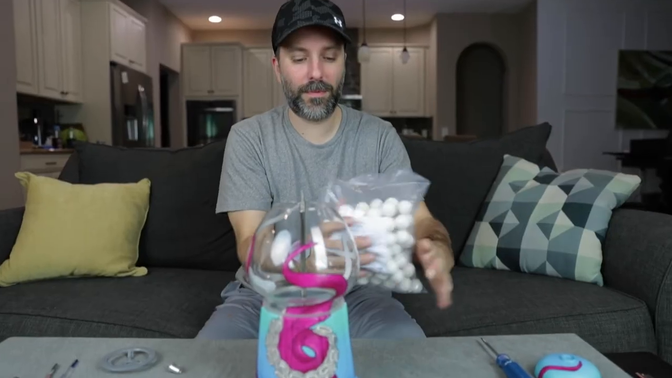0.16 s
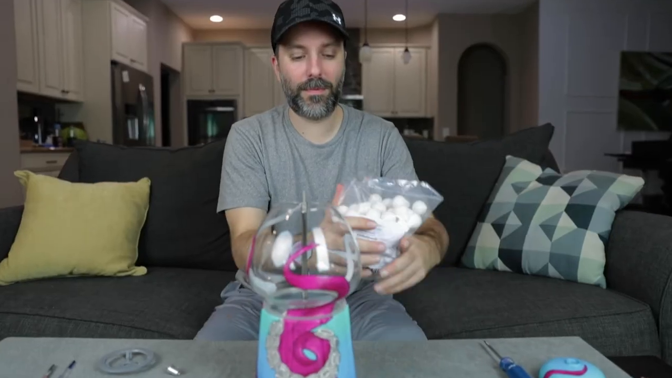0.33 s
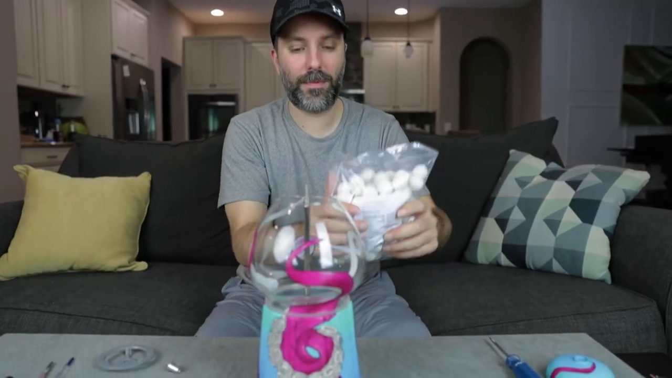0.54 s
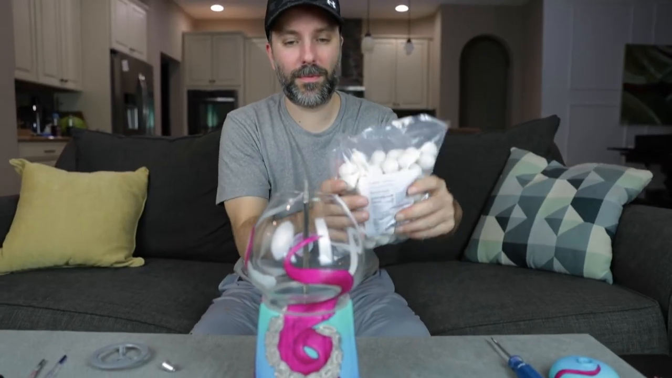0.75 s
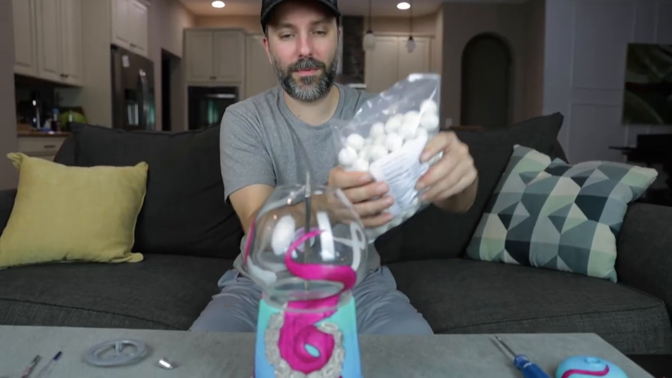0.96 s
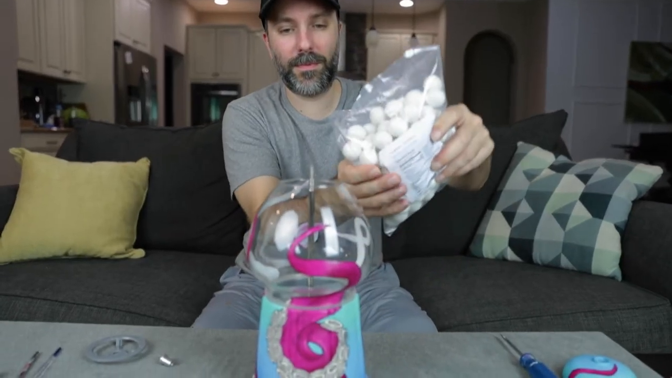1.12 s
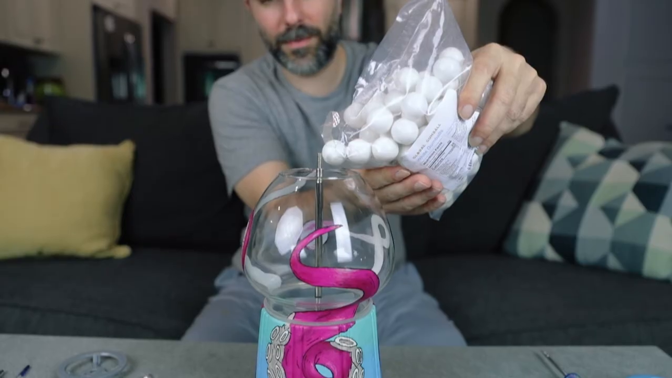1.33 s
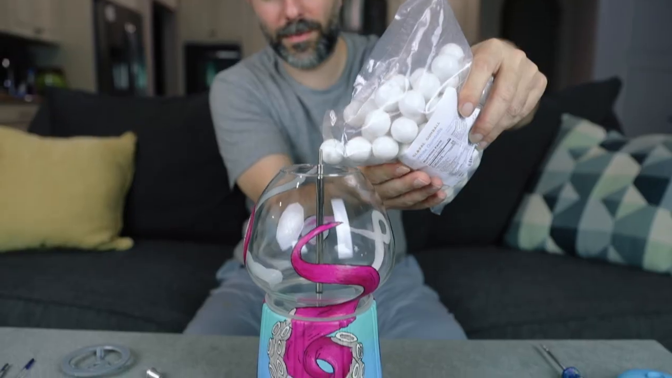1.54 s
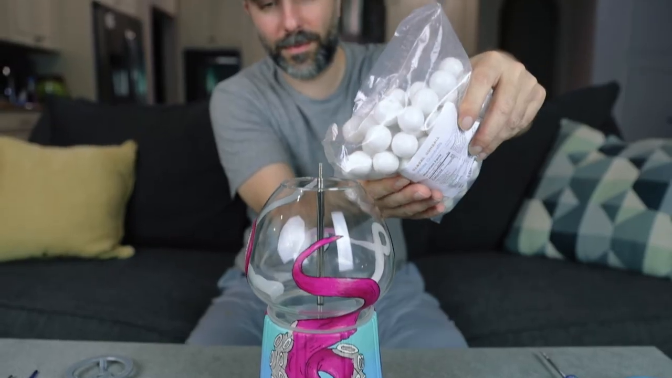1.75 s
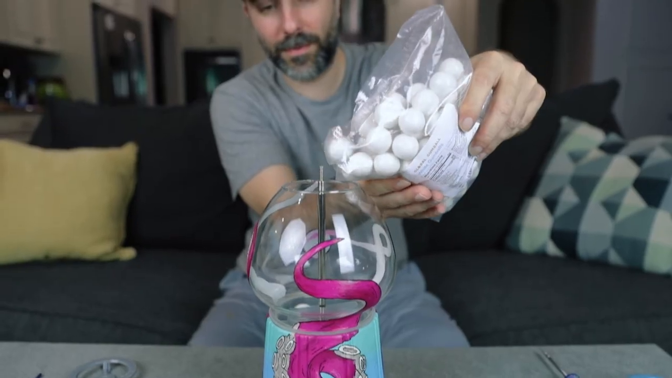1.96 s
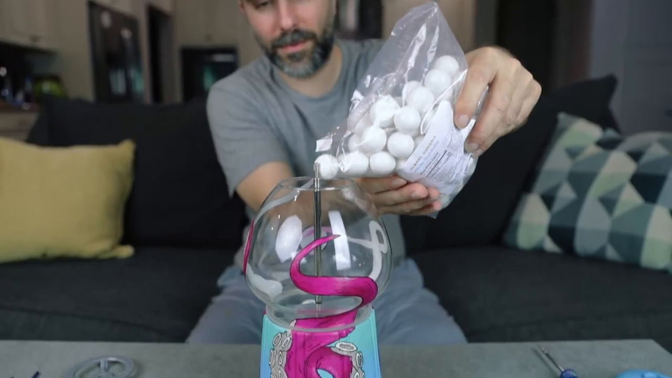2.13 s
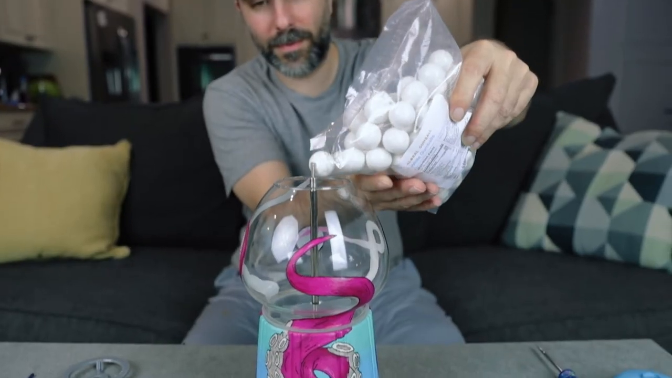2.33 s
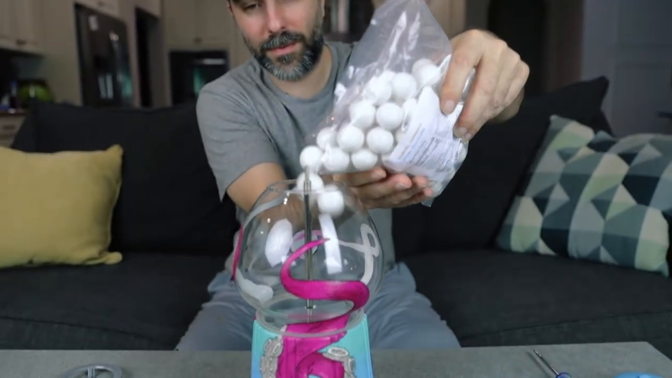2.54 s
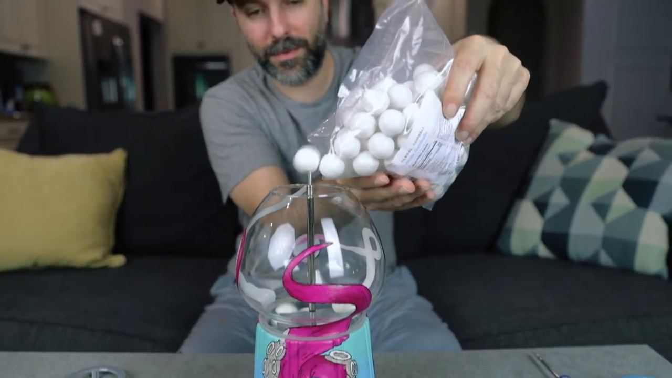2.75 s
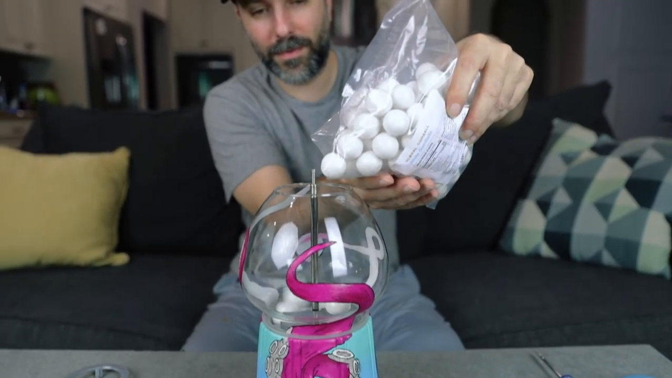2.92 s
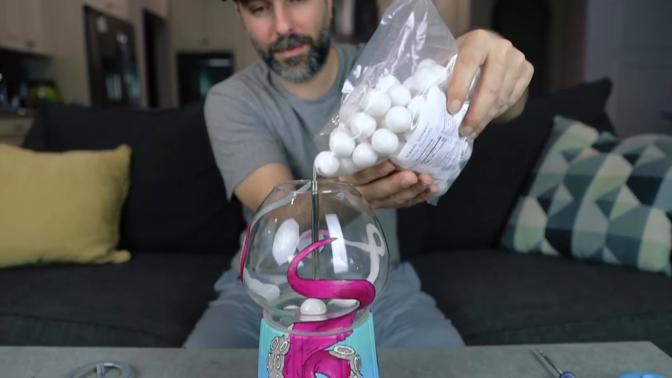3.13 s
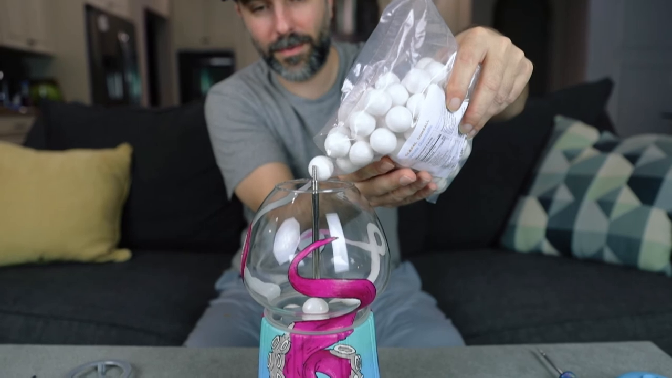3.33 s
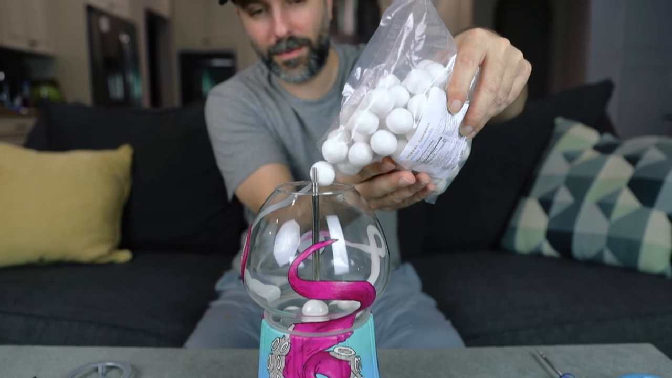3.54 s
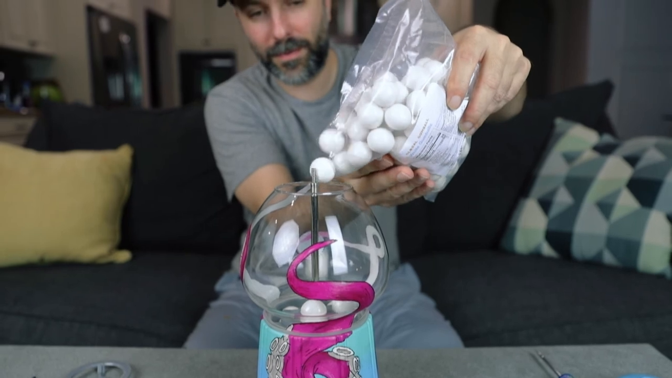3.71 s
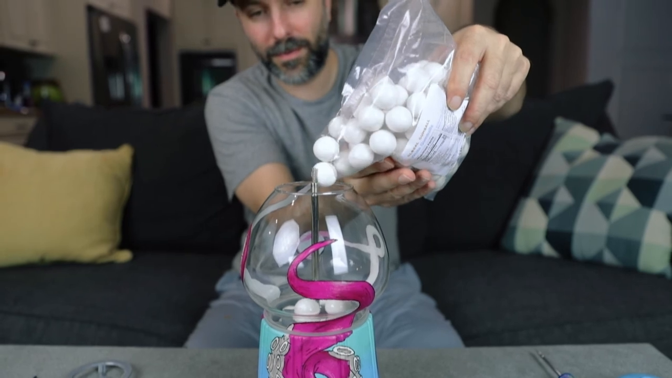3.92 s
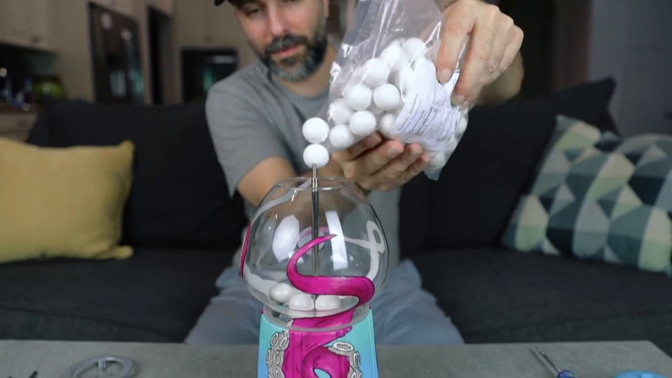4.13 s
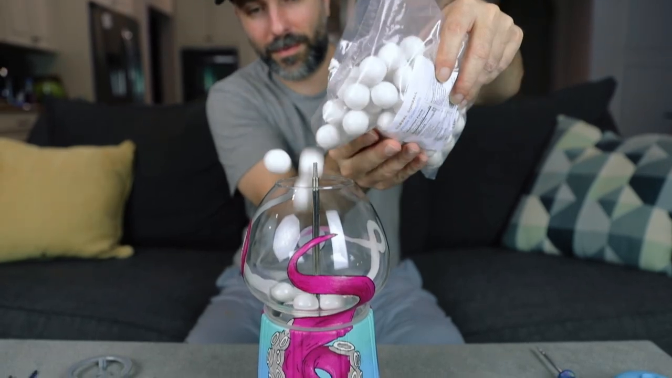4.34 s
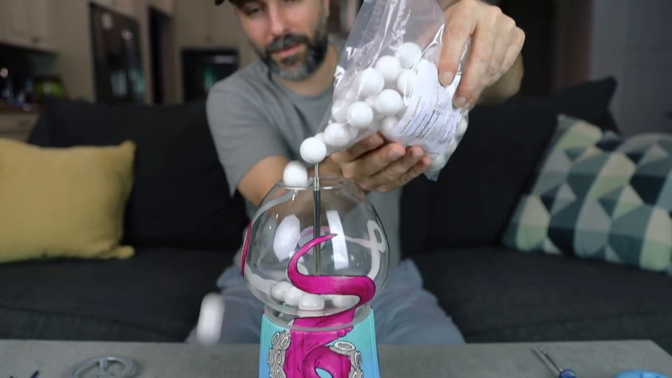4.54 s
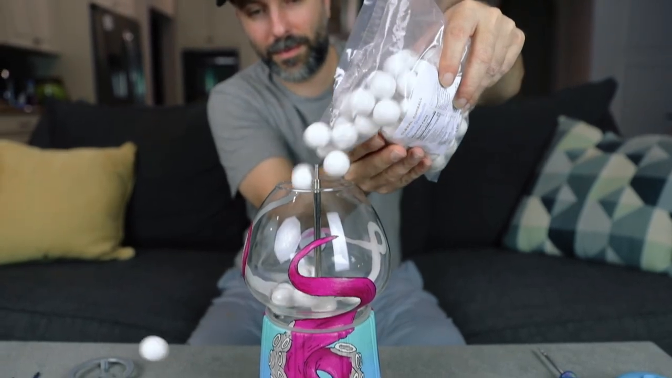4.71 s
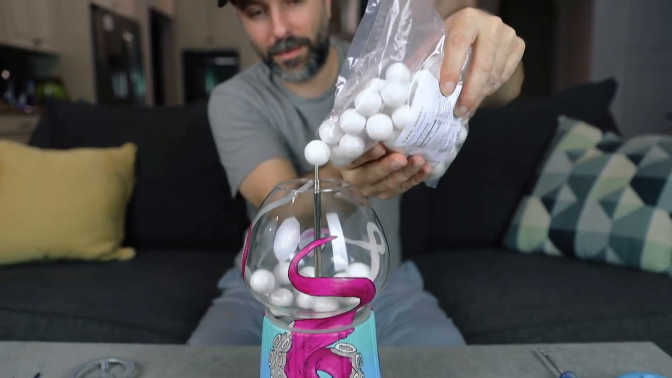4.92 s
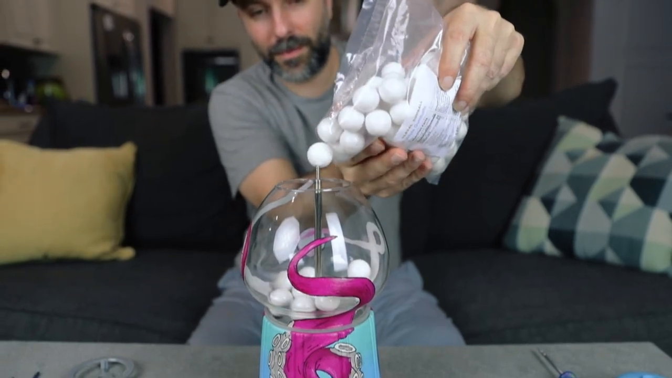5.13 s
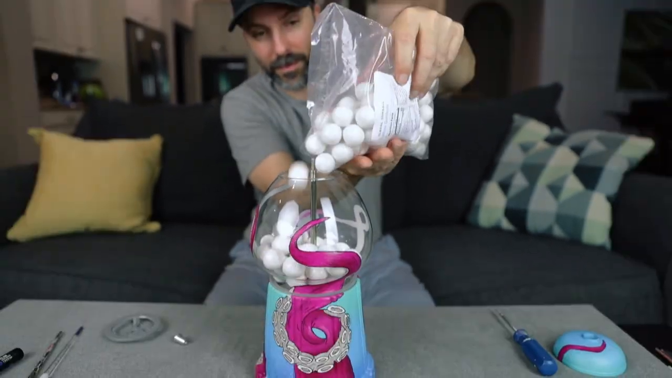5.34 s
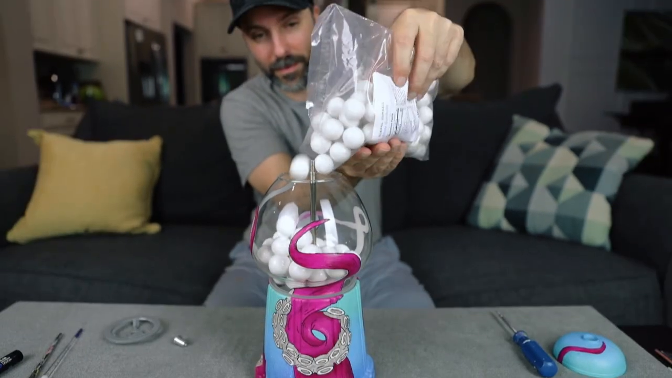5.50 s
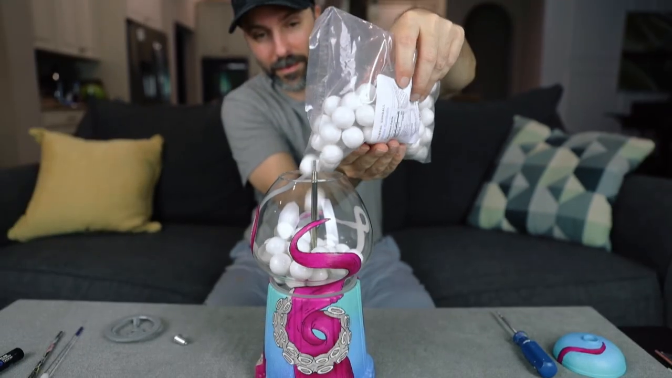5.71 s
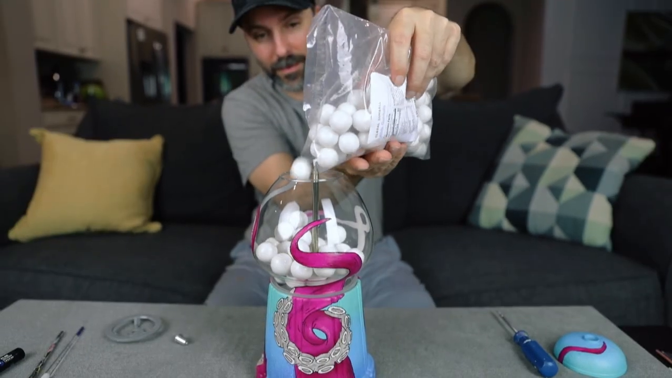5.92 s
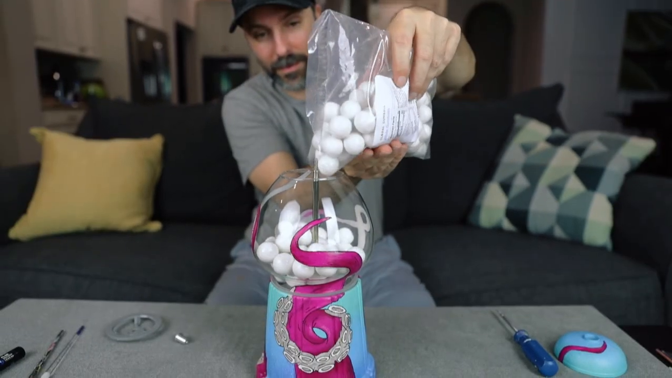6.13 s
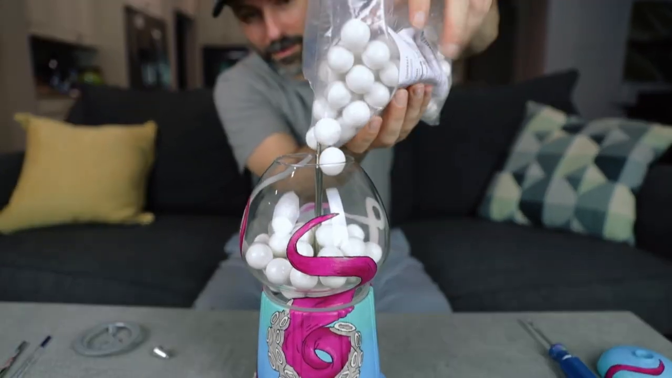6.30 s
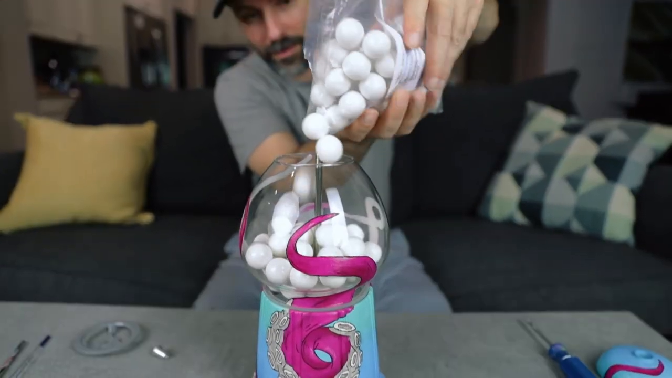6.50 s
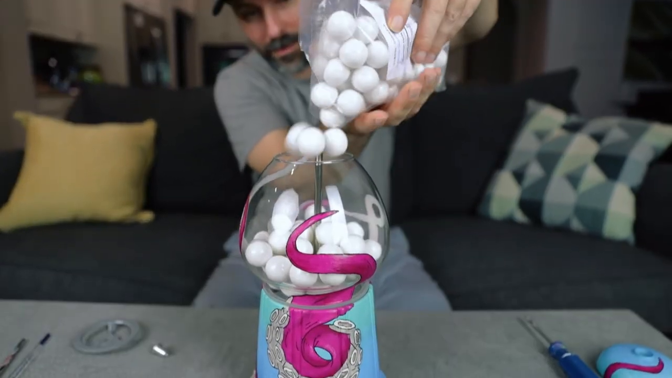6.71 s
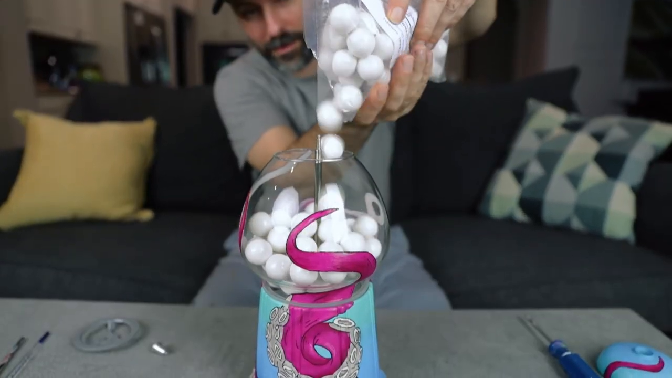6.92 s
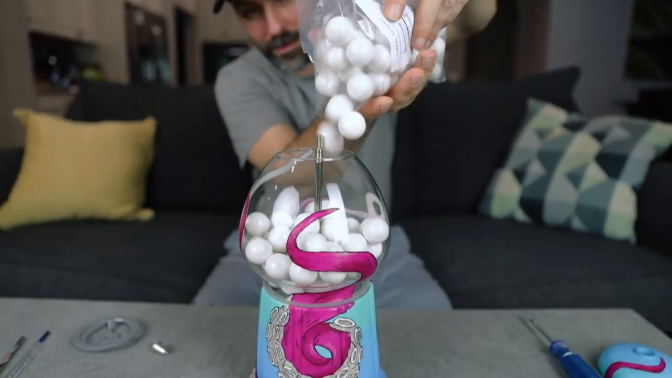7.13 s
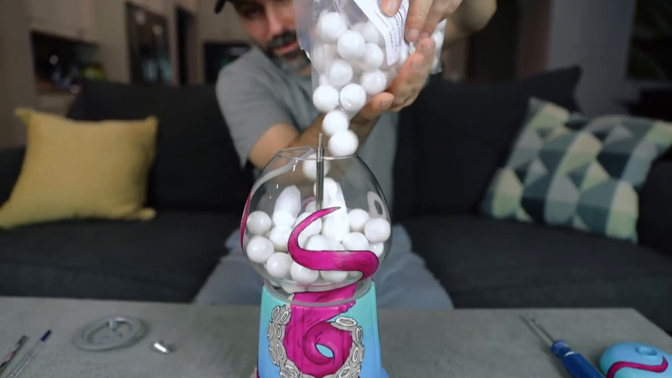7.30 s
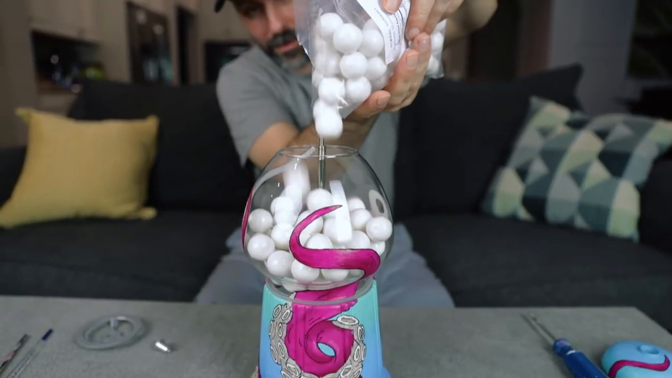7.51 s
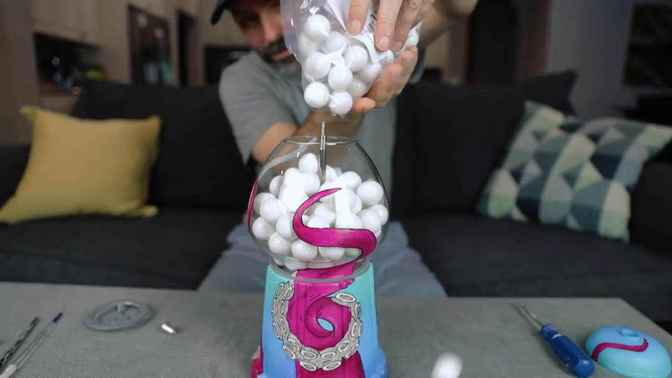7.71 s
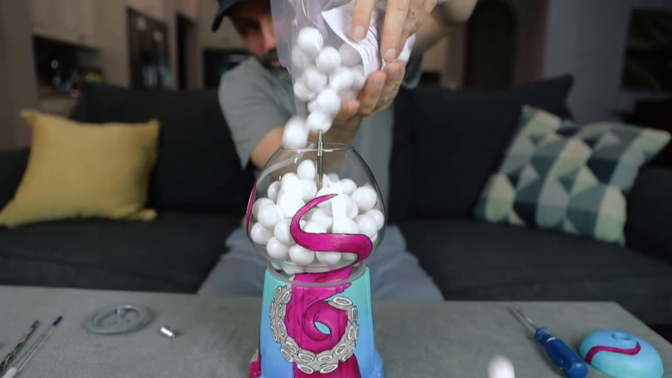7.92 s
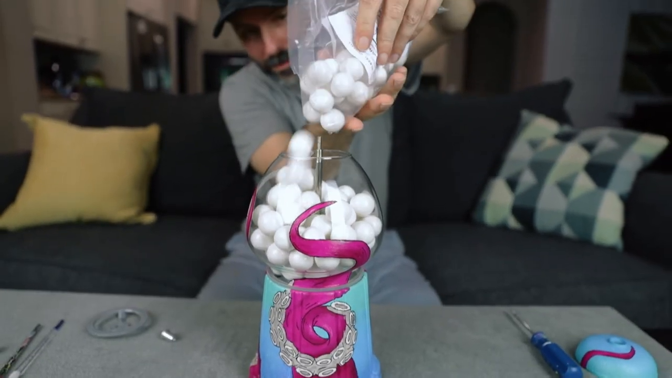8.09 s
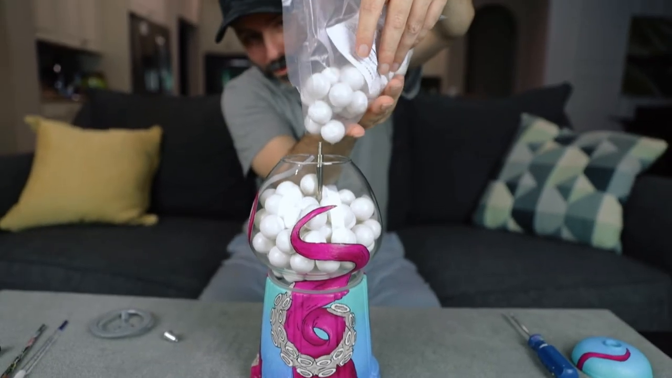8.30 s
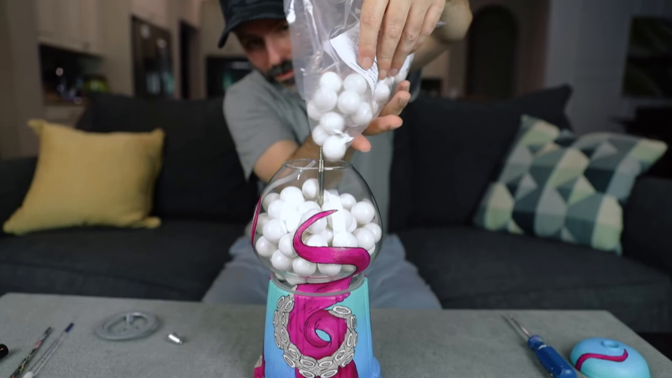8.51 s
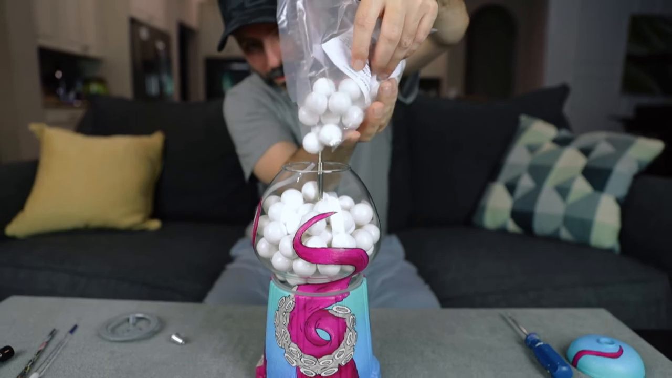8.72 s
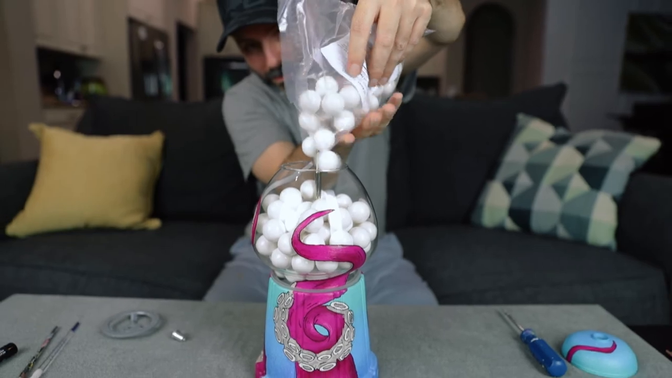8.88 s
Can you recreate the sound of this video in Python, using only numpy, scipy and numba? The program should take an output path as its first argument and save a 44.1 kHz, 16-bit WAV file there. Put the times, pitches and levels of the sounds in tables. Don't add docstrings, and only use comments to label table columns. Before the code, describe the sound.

Small hard hollow balls rattle in a plastic bag, then drop into a glass globe with bright pings, dense clatter and duller final clicks.

```python
import sys
import numpy as np
from scipy import signal
from scipy.fft import rfft, irfft
from scipy.io import wavfile
from scipy.ndimage import uniform_filter1d
from numba import njit

SR = 44100
rng = np.random.default_rng(int(sys.argv[2]) if len(sys.argv) > 2 else 0)


def generate_wav(signal):
    frames = np.transpose(np.atleast_2d(signal))
    scaled = np.clip(frames, -1, 1) * 32767
    pcm = np.round(scaled).astype(np.int16)
    wavfile.write(sys.argv[1], SR, pcm)


def field_ratio(decibels):
    return 10 ** (np.asarray(decibels, dtype=float) / 20)


N = 394694
TIME_S = np.arange(N) / SR


def rms_one(x):
    return x / np.sqrt(np.mean(x ** 2) + 1e-20)


def band(x, low_hz, high_hz, order=2):
    return signal.sosfilt(signal.butter(order, [low_hz, min(high_hz, .45 * SR)], "band", fs=SR, output="sos"), x)


def strikes(s, db):
    out = np.zeros(N)
    np.add.at(out, np.minimum(np.round(np.asarray(s) * SR).astype(int), N - 1), field_ratio(db))
    return out


def burst(clicks, t60_s):
    envelope = signal.lfilter([1], [1, -field_ratio(-60 / (t60_s * SR))], clicks + 1e-18)
    return envelope * rng.standard_normal(N)


def two_pole(clicks, hz, radius, sign=1):
    w = 2 * np.pi * hz / SR
    return signal.lfilter([0, sign * np.sin(w)], [1, -2 * radius * np.cos(w), radius ** 2], clicks + 1e-18)


CUTS_S = [1.333, 4.168, 5.295, 6.257]


def cut_samples():
    return (np.array(CUTS_S) * SR).astype(int)


# time in seconds, share of the globe filled (0 to 1).
FILL = [(0, 0), (4.2, .04), (4.6, .07), (5.29, .15), (5.3, .45), (6, .7), (8.95, 1)]


def filled(s):
    return np.interp(s, *np.transpose(FILL))


@njit
def resonate(clicks, turn, keep):
    out, state = np.zeros(len(clicks)), 0j
    for i in range(len(clicks)):
        state = state * turn * keep[i] + clicks[i]
        out[i] = state.imag
    return out


# time in seconds, loss of the stifled rim modes in dB (below 0: none).
LEANS = [
    (2.948, 2.5),
    (8.11, 12),
    (4.495, -3),
    (4.86, 32),
    (4.932, 27),
    (7.05, 5),
    (7.325, -4),
    (7.6, 15),
    (8.1, 13),
    (8.25, 20),
]


def ring(clicks, hz, t60_empty_s, t60_full_s):
    fill = filled(TIME_S)
    keep = 1 - np.log(1000) / SR * ((1 - fill) / t60_empty_s + fill / t60_full_s)
    if hz in (RIM_HZ[0], RIM_HZ[2]):
        s, loss_db = np.transpose(LEANS)
        keep[(s * SR).astype(int)] *= field_ratio(-np.clip(loss_db, 0, 40))
    keep[cut_samples()] = 0
    return resonate(clicks + 1e-18, np.exp(2j * np.pi * hz / SR), keep)


def body(modes, s, db, spread_db, taps=0):
    chance, out = rng.standard_normal((len(s), len(modes))), 0
    for k, (hz, level_db, t60_empty_s, t60_full_s) in enumerate(modes):
        clicks = strikes(s, db + level_db + spread_db * chance[:, k]) + field_ratio(level_db) * taps
        out = out + (-1) ** (k // 4) * ring(clicks, hz, t60_empty_s, t60_full_s)
    return out


# time in seconds, strength in dB, low hum in dB, hardness (high ring) in dB.
RIM_HITS = [(1.871, -30, -35.5, -59), (2.8882, -9.5, -13, -12.5), (3.844, -47, -34.5, -53),
            (4.394, -9, -10.5, -3.5), (4.4772, -17.5, -24, -15), (4.5262, -15.5, -10.5, -7),
            (4.6006, -18, -10.5, -21), (4.78, -6, -12.5, -9.5), (4.8712, -16, -7.5, -47),
            (4.9645, -39, -9, -40), (5.47, -48, -23.5, -45), (5.8793, -25, -17, -43),
            (6.105, -21.5, -19, -23), (6.2, -26.5, -48, -47), (6.283, -30, -55, -55),
            (6.466, -30, -29.5, -26), (6.74, -21, -37, -9.5), (6.824, -19.5, -21.5, -23.5),
            (6.9207, -22, -18.5, -38), (6.9444, -12.5, -29, -12.5), (6.9843, -11.5, -13.5, -8),
            (7.1318, -17.5, -16, -29), (7.222, -10, -14.5, -10.5), (7.2625, -15.5, -16, -22),
            (7.279, -9, -16.5, -11), (7.4763, -23, -20, -20), (7.4887, -9.5, -12, -7),
            (7.5557, -9.5, -17, -8.5), (7.6292, -7, -16.5, -9), (7.7551, -20, -42, -28),
            (8.0121, -13, -28, -10), (8.0498, -9.5, -39, -10), (8.134, -27, -50, -30),
            (8.1756, -12, -19, -10.5), (8.2303, -16.5, -25, -22), (8.522, -44, -108, -44),
            (8.692, -22, -32, -22.5)]
# main, hum, high, top. Frequencies in Hz.
RIM_HZ = [2821, 1003, 5072, 7360]
# t60 in seconds with the globe empty, t60 in seconds with it full.
RIM_T60 = [(0.3, 0.25), (1.75, 0.16), (0.24, 0.13), (0.065, 0.045)]


def rim():
    s, strength_db, hum_db, hard_db = np.transpose(RIM_HITS)
    top_db = 0.6 + 0.72 * hard_db + 0.28 * strength_db
    pings = 0
    for hz, t60_s, db in zip(RIM_HZ, RIM_T60, [strength_db, hum_db, hard_db, top_db]):
        pings = pings + ring(strikes(s, db - 6.0), hz, *t60_s)
    pings = pings + ring(strikes(s, strength_db - 5), RIM_HZ[0] - 3.64, *RIM_T60[0])
    pings = pings + ring(strikes(s, hard_db - 34), RIM_HZ[2] + 13, *RIM_T60[2])
    contact = band(burst(strikes(s, top_db + 13.0), 0.0017), 1900, 6200)
    return band(pings, 500, 19000) + contact


# time in seconds, clack in dB, tick in dB, thump in dB.
FLOOR_HITS = [(1.8715, -23.5, -10, -35), (1.879, -24, -2, -17), (1.8915, -22, -9, -40),
              (2.075, -51, -45, -43), (2.102, -49, -45, -62), (1.95, -29, -19, -62),
              (1.9667, -44, -16, -24), (2.0032, -35, -35, -55), (2.0921, -36.5, -25, -56),
              (2.3084, -36, -31, -40), (2.344, -38, -51, -34.5), (2.7245, -15, 0.5, -16.5),
              (2.7928, -15.5, -4, -15.5), (2.961, -26, -16.5, -29), (3.0086, -20, -28, -26),
              (3.0257, -45.5, -17.5, -22.5), (3.7257, -35.5, -36, -65), (3.7711, -31.5, -47, -47),
              (3.817, -18, -6, -23), (4.4873, -17, -3, -21.5), (4.5613, -30, -21, -23.5),
              (4.7296, -15, -5, -13.5), (4.9576, -23, 3.5, -13.5)]
# time in seconds, clack in dB, tick in dB.
PILE_HITS = [(5.47, -22, -10), (5.4941, -20.5, -24), (5.517, -27.5, -45), (5.541, -38, -45),
             (5.596, -55, -65), (6.005, -34, -20), (6.04, -45, -28), (6.188, -25, -22), (6.234, -32, -46),
             (7.272, -20, -7), (7.347, -26, -18), (7.43, -20.5, -19), (7.715, -52, -32), (8.11, -24, -30),
             (8.145, -25.5, -27), (8.157, -26, -31), (8.24, -27.5, -4), (6.681, -25.5, -22),
             (6.7085, -26.5, -21), (6.874, -17, -23), (6.8943, -20.5, -4.5), (7.3346, -17, -14),
             (7.3586, -21, -13), (7.4071, -23, -13), (7.452, -23, -10), (7.5292, -15.5, -7),
             (7.599, -18.5, -8), (7.6848, -21.5, -11), (7.7547, -19, -20), (7.791, -28, -45),
             (7.978, -28.5, -31), (8.2133, -24, -13), (8.2861, -23, -14.5), (8.6602, -23, -17),
             (8.694, -33, -14), (8.7696, -64, -24)]
# time in seconds, ring in dB, tick in dB.
BARE_WALL_HITS = [(2.7806, -12, -33), (2.8305, -8, -6), (2.9997, -18, -1.5), (3.066, -8, -7),
                  (3.2046, -26.5, -54), (3.3347, -23, -40.5), (3.5363, -33, -43), (3.842, -12, -48),
                  (4.0326, -24, -30.5), (4.5386, -9, -10), (4.563, -12, -12), (4.6023, -19, -11),
                  (4.744, -7.5, -45), (4.7964, -8.5, -1.5), (4.857, -11, -11.5), (4.8964, -7, -6),
                  (4.935, -5, -3), (4.9593, -3.5, -21), (5.028, -5.5, -11.5), (5.061, -11, -11),
                  (5.0947, -9.5, -8.5), (5.247, -19, -18.5)]
# time in seconds, ring in dB, tick in dB.
BURIED_WALL_HITS = [(5.6566, -24, -23), (5.66, -12, -9), (5.6942, -19.5, -16.5), (5.786, -29, -28),
                    (5.81, -19.5, -29), (5.8526, -16.5, -16), (5.928, -16, -17), (5.968, -20, -25),
                    (6.908, -7, -29), (7.094, -29, -9), (7.102, -18, -30), (7.112, -17, -15),
                    (5.7124, -17, -15), (5.7701, -17.5, -19), (5.8214, -12.5, -10.5), (5.881, -11.5, -5.5),
                    (5.949, -26, -13.5), (6.0712, -13, -12.5), (6.099, -13, -8.5), (6.141, -22, -14),
                    (6.1766, -17, -26), (6.211, -21.5, -21), (6.6139, -13.5, -9), (6.9044, -30, -6),
                    (7.003, -11.5, -5), (7.0814, -6.5, -11), (7.1278, -11.5, -7.5), (7.4651, -12.5, -7),
                    (7.6561, -24, -7.5)]
# time in seconds, clack in dB.
SOFT_CLICKS = [(2.5416, -41), (2.595, -38.5), (3.266, -38.5), (4.25, -50.5), (4.317, -40.5), (5.323, -33.5),
               (6.384, -41), (6.518, -30.5), (7.902, -30.5), (7.947, -40), (8.4142, -35), (8.546, -35.5),
               (8.583, -35), (8.745, -34), (8.789, -28.5), (8.6227, -35), (8.8985, -32.5)]


def all_knocks():
    rows = [(s, tick, clack, clack - 33, thump) for s, clack, tick, thump in FLOOR_HITS]
    rows += [(s, tick, clack, clack - 3.5, clack - 6) for s, clack, tick in PILE_HITS]
    rows += [(s, tick, (wall + tick) / 2 - 13, wall, tick - 19) for s, wall, tick in BARE_WALL_HITS]
    rows += [(s, tick, (wall + tick) / 2 - 10, wall, tick - 18.5) for s, wall, tick in BURIED_WALL_HITS]
    return rows + [(s, clack - 24, clack, clack - 23, clack - 45.5) for s, clack in SOFT_CLICKS]


def with_rebounds(rows, wait_s, loss_db):
    s, *levels = np.transpose(rows)
    later = s + .004 + wait_s * rng.random(len(s))
    loss = loss_db * (0.48 + rng.random(len(s)))
    return [np.r_[s, later]] + [np.r_[db, db - loss] for db in levels]


def settling(column, rim_db):
    rise_s, fall_db_per_s = 0.0027, 109
    knock, hit = np.array(all_knocks()), np.array(RIM_HITS)
    kicks = strikes(knock[:, 0], 2 * knock[:, column]) + strikes(hit[:, 0], 2 * (hit[:, 1] + rim_db)) + 1e-14
    fall, rise = field_ratio(-2 * fall_db_per_s / SR), np.exp(-1 / (rise_s * SR))
    parts = []
    for part in np.split(kicks, cut_samples()):
        rolling = signal.lfilter([1], [1, -fall], part)
        parts.append(signal.lfilter([1 - rise], [1, -rise], rolling))
    few_balls_db = -1.5 * (1 - filled(TIME_S))
    return -13.5 + few_balls_db + 10 * np.log10(np.concatenate(parts) + 1e-14)


# frequency in Hz, level in dB, t60 in seconds empty, t60 in seconds full.
WALL = [(4265, -8, .14, .015), (4320, -1, .1, .02), (4430, -8, .14, .07), (4545, -9, .12, .05),
        (4360, -8, .08, .025), (1598, -8, .11, .04), (1555, -16, .08, .08), (7800, -15, .06, .03),
        (8640, -14, .028, .02), (11300, -22, .04, .03), (3570, -14, .11, .04), (2790, -18, .15, .08)]
LOADED_WALL = [(4430, -19.5, .1, 0.046), (4465, -8, .08, .05), (2590, -10.5, 0.12, 0.17),
               (7800, -12.5, .06, 0.042)]
HOLLOW = [(487.4, 5, 0.062, 0.0078), (436, -33, 0.22, 0.011), (586, -5.5, 0.02, 0.12),
          (222, -36, 0.0064, 0.014)]
STAND = [(122, 2.5, 0.24, 0.06), (113.6, 7.5, 0.2, 0.13)]
SHELL = [(792, -9.5, 0.036, 0.066), (1124, -6.5, 0.056, 0.018), (1890, -10.5, 0.013, 0.041),
         (2618, -3, 0.012, 0.028), (3315, -0.5, 0.027, 0.02), (3703, 1, 0.038, 0.02)]


def knocks():
    s, tick_db, clack_db, wall_db, thump_db = with_rebounds(all_knocks(), wait_s=0.028, loss_db=23.0)
    fill = filled(s)
    clack = band(burst(strikes(s, clack_db + 10.5), 0.042), 1350, 4570)
    mid = band(burst(strikes(s, tick_db - 9.0), 0.04), 7480, 8700)
    tick = band(burst(strikes(s, tick_db - 12.5), 0.029), 4800, 13000)
    tick = tick + band(burst(strikes(s, tick_db - 23.0), 0.0071), 5900, 21000)
    taps_per_s = 320
    taps = field_ratio(settling(column=3, rim_db=-33) - 11) * rng.standard_normal(N) * (rng.random(N) < taps_per_s / SR)
    wall = body(WALL, s, wall_db - 4, spread_db=3.5, taps=taps)
    load_db = 20 * np.log10(fill + 1e-3)
    wall = band(wall + body(LOADED_WALL, s, wall_db + load_db - 4, spread_db=3.5), 900, 19000)
    hollow = band(body(HOLLOW, s, thump_db + 1.5, spread_db=2.0), 150, 1500)
    coupling_db = -18.5 + 11.5 * fill
    stand = band(body(STAND, s, 0.99 * thump_db + coupling_db, spread_db=4.0), 112.0, 153.6)
    crack = band(burst(strikes(s, wall_db - 12.5) + strikes(s, clack_db + 8.5), 0.001), 1300, 3900)
    shells = band(body(SHELL, s, clack_db, spread_db=3.5), 500, 6000)
    return shells + crack + clack + mid + tick + wall + hollow + stand


# time in seconds, peak in dB.
GLINTS = [(2.831, -15), (2.8885, -14), (3.067, -13.5), (4.3936, -14), (4.475, -18.5), (4.526, -19),
          (4.732, -15), (4.744, -24), (4.7786, -7), (4.784, -9), (4.8577, -20), (4.9333, -10),
          (4.9655, -10), (5.029, -8), (5.4707, -17), (5.495, -16), (5.658, -7), (5.879, -19), (6.0722, -19),
          (6.1433, -13.5), (6.4666, -37), (6.6157, -32), (6.6801, -24), (6.7085, -14), (6.738, -11),
          (6.8746, -16.5), (6.9215, -9.5), (6.992, -14), (7.046, -22), (7.059, -21), (7.0813, -18),
          (7.129, -5), (7.158, -10), (7.263, -17.5), (7.3426, -10), (7.408, -22), (7.47, -9), (7.5307, -9),
          (7.6, -21), (7.6274, -13.5), (7.756, -15), (8.01, -15), (8.049, -13), (8.177, -9.5), (8.188, -9),
          (8.2107, -9), (8.5216, -27), (8.6641, -35), (8.6946, -8)]
# frequency in Hz, level in dB.
GLINT_MODES = [(7880, -6), (8480, -3.5), (8980, -1.5), (9410, -6.5), (9640, -9), (10210, -12),
               (10500, -11.5), (11300, -7.5), (11700, -3.5), (12650, -7.5), (14050, -7), (15200, -10)]


def glints():
    rows = [(s, db - 14) for s, db in GLINTS]
    rows += [(s, tick_db - 24.5) for s, tick_db, *_ in all_knocks()]
    rows += [(s, hard_db - 19.5) for s, *_, hard_db in RIM_HITS]
    s, db = np.transpose(rows)
    t60_s, spread_db = 0.037, 5.6
    radius, out = field_ratio(-60 / (t60_s * SR)), 0
    for k, (hz, level_db) in enumerate(GLINT_MODES):
        clicks = strikes(s, db + level_db + spread_db * rng.standard_normal(len(s)))
        out = out + two_pole(clicks, hz, radius, sign=(-1) ** k)
    return band(out, 6500, 19000)


# time in seconds, peak in dB, pitch in Hz, limiter duck in dB (below 0: none).
BOUNCES = [
    (4.682, 1.5, 1890, 13),
    (4.9503, -2, 1600, 2),
    (5.112, -6, 1116, -2),
    (5.209, -15.5, 1060, -12),
    (7.7704, 2, 1500, 12.5),
    (8.0384, -3, 1317, 3.5),
    (8.1961, -6.5, 1080, -7),
    (8.292, -15.5, 770, 4.5),
]


def bounces():
    cycles = np.zeros(N)
    t = np.arange(int(.03 * SR)) / SR
    for s, db, hz, _ in BOUNCES:
        falling = np.sin(2 * np.pi * hz * t * (1 - 30 * np.minimum(t, .01)))
        cycles[round(s * SR):][:len(t)] -= field_ratio(db - 2.0) * falling * field_ratio(-60 * t / 0.028)
    s, db, *_ = np.transpose(BOUNCES)
    edge = band(burst(strikes(s, 1.7 * db - 8.5), 0.0053), 2800, 14000)
    wash = band(burst(strikes(s, db - 6), 0.27), 227, 2330, order=3)
    push = band(strikes(s, 3.8 * db + 14.0) + 1e-18, 22, 150, order=1)
    return band(cycles, 187, 6300) + edge + wash + push


def ducking():
    s, *_, depth_db = np.transpose(BOUNCES)
    steps = np.zeros(N)
    steps[np.round(s * SR).astype(int) + 60] = np.clip(depth_db, 0, 40)
    return field_ratio(-signal.lfilter([1], [1, -np.exp(-1 / (.06 * SR))], steps + 1e-18))


def grains(per_s, low_hz, high_hz, cycles, uneven_db, count=8):
    sizes = field_ratio(uneven_db * np.minimum(rng.exponential(1, N), 3)) * (rng.random(N) < per_s / SR)
    dealt, out = rng.integers(0, count, N), 0
    for k, hz in enumerate(np.geomspace(low_hz, high_hz, count)):
        out = out + two_pole(sizes * (dealt == k), hz, radius=field_ratio(-60 * hz / (cycles * SR)))
    return rms_one(band(out, .7 * low_hz, 1.3 * high_hz))


# time in seconds, rattle in dB, low bumps in dB, fall in dB per second.
SHAKES = [(.03, -33.5, -39, 32), (.72, -47, -48, 93), (0.167, -27.5, -36, 106), (0.284, -20, -27.5, 189),
          (0.398, -25, -38, 135), (0.517, -25, -31.5, 114), (0.598, -24.5, -32.5, 151),
          (.84, -68, -64, 169), (.99, -39.5, -49, 193), (1.17, -45, -78, 150), (1.22, -48, -61, 148),
          (1.28, -37.5, -54, 302), (1.36, -53, -84, 46), (1.5, -65, -59.5, 183), (1.549, -41, -52, 251),
          (1.72, -55, -59.5, 95), (2.571, -50, -61, 43), (3.629, -47.5, -56.5, 93.5), (4.279, -59, -69, 69),
          (5.35, -29, -42, 102), (6.3, -27.5, -44.5, 56), (6.58, -30.5, -43.5, 48), (7.9, -46, -45, 70),
          (8.58, -60, -51, 106), (8.751, -43.5, -72, 70)]


def shaking(column):
    rise_db_per_s = 253.5
    t = np.arange(0, N + 64, 64)[:, None] / SR
    rows = np.array(SHAKES)
    late_s = t - rows[:, 0]
    slope_db = np.where(late_s < 0, rise_db_per_s * late_s, -np.maximum(rows[:, 3], 40) * late_s)
    db = rows[:, column] + slope_db
    db[np.searchsorted(CUTS_S, t) > np.searchsorted(CUTS_S, rows[:, 0])] = -120
    return np.interp(TIME_S, t[:, 0], 10 * np.log10(np.sum(field_ratio(2 * db), axis=1) + 1e-14))


# time in seconds, level in dB.
SNAPS = [(0.7919, -23), (0.8318, -27.5), (0.979, -25.5), (1.019, -25.5), (1.083, -40), (1.189, -32),
         (1.35, -36.5), (1.3752, -32.5), (1.485, -25.5), (1.5434, -19.5), (1.7723, -34)]
# time in seconds, peak in dB.
CRACKS = [(0.0244, -22), (0.04, -18.5), (0.094, -19), (0.094, -19), (0.12, -11), (0.148, -22),
          (0.1715, -24), (0.193, -19), (0.2314, -19), (0.2633, -8), (0.479, -12), (0.563, -5.5),
          (0.598, -6), (0.6545, -16), (0.6777, -15),
          (0.923, -29), (0.9472, -42), (0.946, -36), (0.9834, -45), (0.999, -23), (1.0355, -35),
                (1.058, -24), (1.1238, -49.5), (1.1404, -49), (1.1558, -49), (1.1686, -39), (1.1764, -45),
                (1.1977, -45), (1.236, -24), (1.2535, -40), (1.2535, -35), (1.2666, -18), (1.2794, -34),
                (1.3014, -40), (1.3233, -27), (6.27, -15), (6.296, -24), (6.3106, -11), (6.347, -13),
                (6.372, -10), (6.394, -7), (6.489, -11), (6.554, -19), (6.562, -14)]
# time in seconds, peak in dB.
TICKS = [(1.7285, -56), (2.0646, -15), (2.153, -24), (2.6778, -20), (3.2077, -25), (3.2304, -14),
         (3.394, -36), (3.478, -45), (3.4857, -43), (3.5634, -13), (3.576, -33), (3.6077, -26),
         (3.6285, -39.5), (3.6514, -34), (3.674, -33), (3.695, -19), (3.7725, -23), (3.7894, -28),
         (3.899, -13), (3.961, -6.5), (4.0602, -23), (4.2687, -45), (5.406, -26), (5.4352, -8),
         (5.6335, -31), (5.648, -22), (5.466, -14), (7.823, -10), (8.4129, -6.5), (8.446, -46),
         (8.5435, -23), (8.5693, -19), (8.591, -17), (8.771, -6.5), (8.809, -32), (8.8657, -22)]


def rattle():
    bag_db, bump_db = shaking(column=1), shaking(column=2)
    pour_db = settling(column=2, rim_db=-10)
    film_db = 10 + 1.53 * bag_db
    ticking_db = 25 + 1.99 * pour_db
    clicks = grains(450, 3046, 4170, cycles=24.0, uneven_db=3.0)
    clicks = clicks + field_ratio(-6.5) * grains(500, 1050, 3400, cycles=5.6, uneven_db=-0.5)
    bumps = band(grains(220, 281, 780, cycles=13.0, uneven_db=2.5), 170, 1600)
    film = grains(600, 4900, 8500, cycles=14.0, uneven_db=3.5)
    ticking = grains(1400, 6000, 14000, cycles=30.0, uneven_db=2.0)
    s, db = np.transpose(SNAPS)
    snaps = band(burst(strikes(s, db + 1.0), 0.031), 1220, 4870, order=3)
    s, db = np.transpose(CRACKS + TICKS)
    snaps = snaps + band(burst(strikes(s, db - 6), .013), 1500, 5400, order=3)
    bag = field_ratio(bag_db - 3.0) * clicks + field_ratio(bump_db - 3.5) * bumps
    bag = bag + field_ratio(film_db - 12.5) * film + field_ratio(film_db - 30.0) * ticking
    pour = field_ratio(pour_db) * (clicks + field_ratio(-12.5) * bumps + field_ratio(-13.0) * film) + field_ratio(ticking_db - 1.5) * ticking
    return bag + snaps + pour


# time in seconds, level in dB.
THUDS = [
    (0.844, -33),
    (0.976, -64),
    (1.191, -29),
    (1.283, -38),
    (1.489, -36),
    (1.544, -30),
    (1.78, -45),
    (3.539, -50),
    (3.73, -33),
]


def thuds():
    s, db = np.transpose(THUDS)
    return band(burst(strikes(s, db + 13.0), 0.043), 200, 400, order=3)


# frequency in Hz, t60 in seconds.
ROOM = [(100, 0.33), (500, 0.55), (2000, 0.69), (5000, 0.4), (15000, 0.27)]


def room(x):
    t, tail = np.arange(int(.5 * SR)) / SR, 0
    hz, t60_s = np.transpose(ROOM)
    edges_hz = 70 * 2. ** np.arange(9)
    for low, high in zip(edges_hz, edges_hz[1:]):
        decay_s = np.interp(np.log(low * high) / 2, np.log(hz), t60_s)
        tail = tail + band(rng.standard_normal(len(t)), low, high) * field_ratio(-60 * t / decay_s)
    tail = tail * np.clip(t / 0.0014 - .3, 0, 1)
    tail = tail / np.sqrt(np.sum(tail ** 2))
    parts = np.split(x, cut_samples())
    return np.concatenate([signal.fftconvolve(p, tail)[:len(p)] for p in parts])


def gate(x):
    low = signal.sosfiltfilt(signal.butter(5, 900, "low", fs=SR, output="sos"), x)
    high = signal.sosfiltfilt(signal.butter(5, 5200, "high", fs=SR, output="sos"), x)
    out = 0
    for part, threshold_db, steepness in [(low, -51.5, 1), (x - low - high, -49.5, 1), (high, -64, 1.9)]:
        level_db = 10 * np.log10(np.abs(uniform_filter1d(part ** 2, size=768)) + 1e-14)
        gain_db = steepness * np.clip(0.7 * (level_db - threshold_db), -16, 0)
        out = out + part * field_ratio(uniform_filter1d(gain_db, size=256))
    return out


# time in seconds, length in seconds, level in dB.
TREMORS = [
    (0.3, .2, -79),
    (2.515, .15, -67),
    (3.974, 0.17, -52.5),
    (4.21, 0.14, -76.5),
    (4.416, 0.054, -41),
    (5.38, .15, -75),
    (6.33, .25, -62),
    (7.267, 0.082, -48),
]


def tremors():
    swell = sum(field_ratio(db) * np.exp(-((TIME_S - s) / (length_s / 2)) ** 2) for s, length_s, db in TREMORS)
    return swell * rms_one(band(rng.standard_normal(N), 45, 120))


# frequency in Hz, density in dB per Hz.
FLOOR = [(35, -15), (60, -8), (110, 13), (167, -27), (262, 0.5), (600, -16), (780, -29.5), (1320, -120)]


def floor():
    hz, db = np.transpose(FLOOR)
    shape = field_ratio(np.interp(np.log(np.fft.rfftfreq(N, 1 / SR) + 1), np.log(hz), db))
    return field_ratio(-88.5) * rms_one(irfft(rfft(rng.standard_normal(N)) * shape, N))


# time in seconds, gain in dB.
HUSH = [(0, 0), (4.164, 0), (4.17, -30), (4.245, -20), (4.25, 0), (8.95, 0)]


def scene():
    pings, table = rim(), bounces()
    globe = knocks() + glints() + rattle() + thuds()
    near = pings + globe + room(field_ratio(-9.0) * globe + field_ratio(-13.5) * pings)
    mix = gate(ducking() * near) + table + room(field_ratio(-13.0) * table) + floor()
    hush_db = np.interp(TIME_S, *np.transpose(HUSH))
    return (mix * field_ratio(hush_db) + tremors())[None]


def low_pass(x):
    return signal.sosfilt(signal.butter(12, 16970, fs=SR, output="sos"), x)


def record(dry):
    x = signal.sosfilt(signal.butter(2, 45, "high", fs=SR, output="sos"), dry)
    x = .9 * np.tanh(x / .9)
    x = signal.sosfilt(signal.cheby2(12, 80, 17000, fs=SR, output="sos"), x)
    return low_pass(x)


dry = scene()
out = record(dry)
generate_wav(out)
```